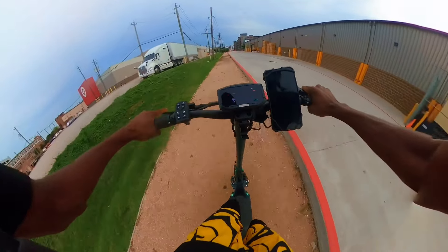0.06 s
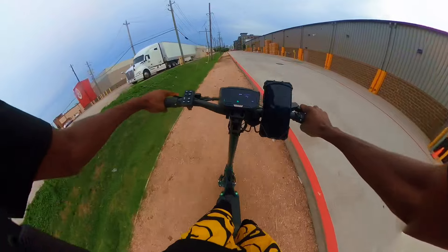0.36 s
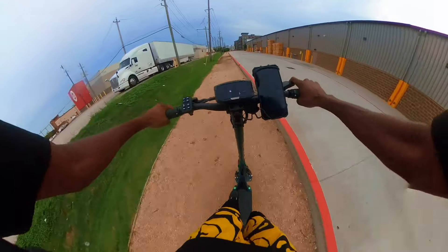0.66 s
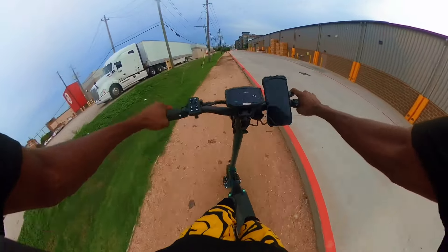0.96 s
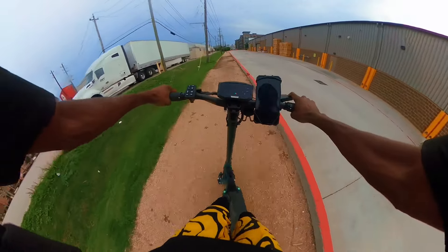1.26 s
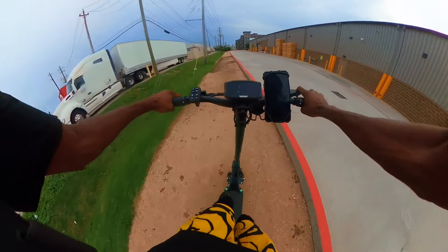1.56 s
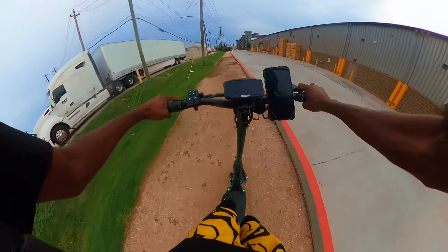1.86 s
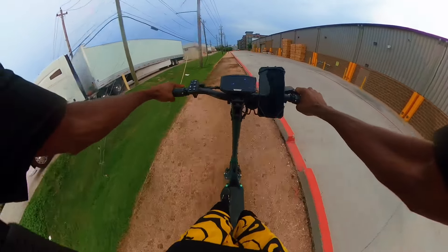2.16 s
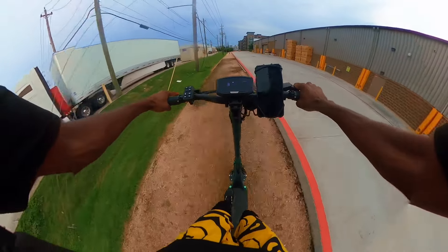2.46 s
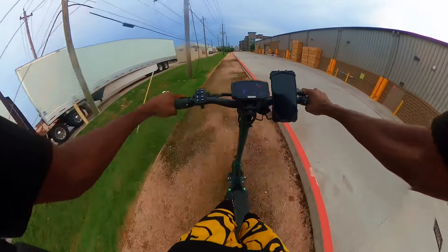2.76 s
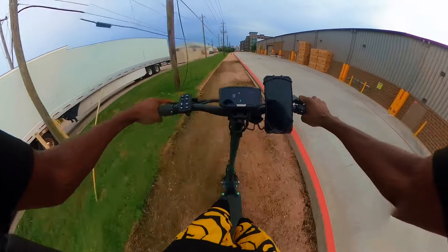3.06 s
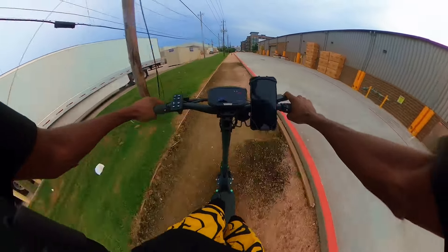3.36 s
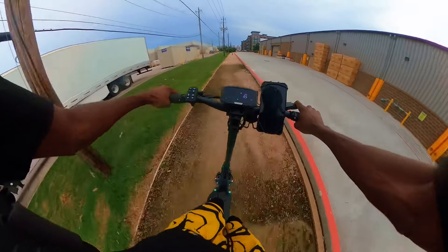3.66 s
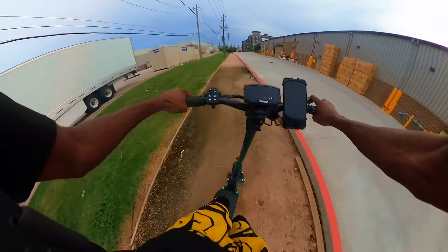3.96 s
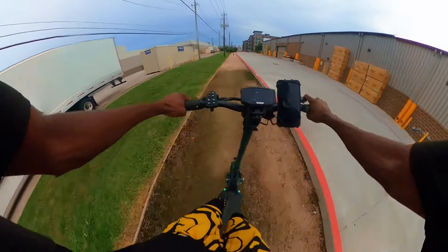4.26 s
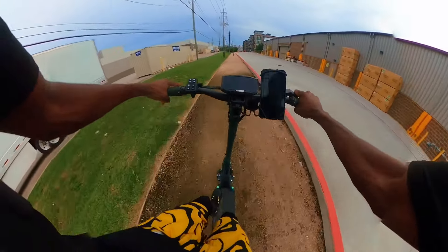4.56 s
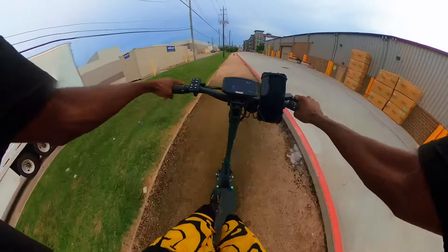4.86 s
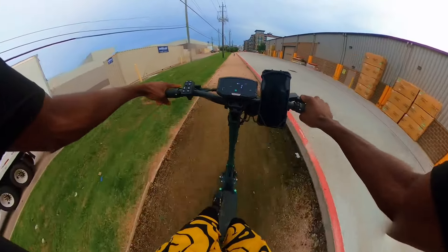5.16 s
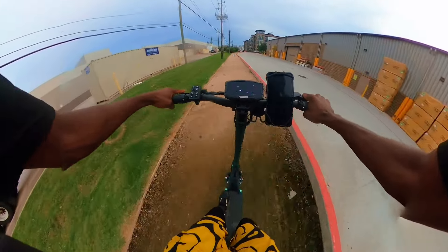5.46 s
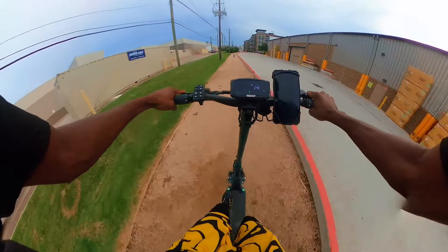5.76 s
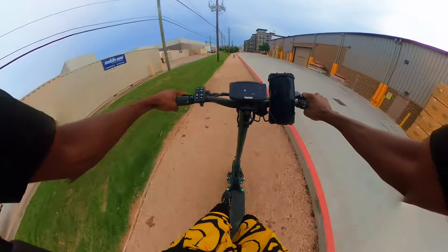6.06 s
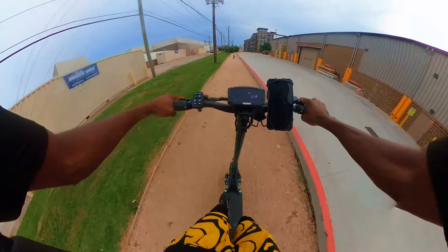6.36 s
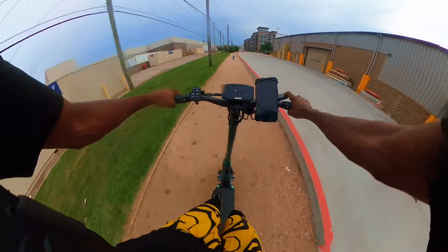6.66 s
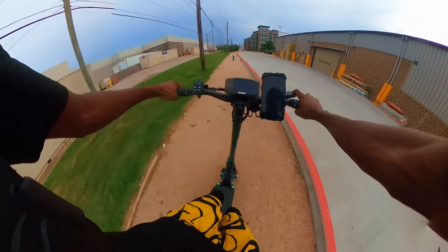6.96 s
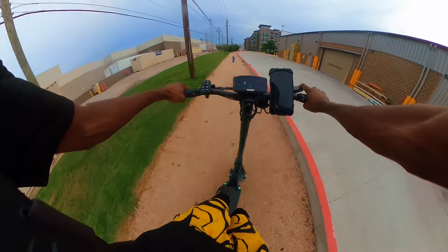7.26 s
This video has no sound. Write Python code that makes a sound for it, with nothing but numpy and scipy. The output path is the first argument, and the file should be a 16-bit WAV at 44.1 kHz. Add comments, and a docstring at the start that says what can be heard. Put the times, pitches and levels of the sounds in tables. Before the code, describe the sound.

An electric scooter rolls along an outdoor dirt path, its tyres rumbling and crunching through patches of gravel. Grit sprays, pebbles tick on the frame and a loose fitting rattles now and then. A faint, high motor whine fades early while the frame shudders, then bumps give the deck low, hollow thumps. The ride smooths briefly and turns rough again near the end. Wind buffets the close microphone on the rider throughout.

```python
"""Gravel crunches and rumbles under the tyres of an electric scooter on a dirt path.
Stones drum on the tread and ring the casings, grit sprays, pebbles tick on the frame.
The deck thumps over bumps and shudders, a loose fitting rattles, gravel excites a thin, high ring.
The motor drive whines faintly, and wind buffets a microphone on the rider."""
import sys
import numpy as np
from scipy import signal
from scipy.fft import rfft, irfft, next_fast_len
from scipy.io import wavfile
from scipy.ndimage import map_coordinates

SR = 44100
rng = np.random.default_rng(int(sys.argv[2]) if len(sys.argv) > 2 else 0)


def int16_out(signal):
    """Quantize to a 16-bit WAV file."""
    q = np.round(np.clip(np.atleast_2d(signal).T, -1, 1) * 32767)
    wavfile.write(sys.argv[1], SR, q.astype(np.int16))


N = 331632
T = np.arange(N) / SR


# packed dirt coarseness: t/s, relative level/dB
DIRT = [(0, -25), (.65, -30), (1.3, -27.5), (1.95, -33.5), (2.65, -30.5), (3.35, -42.5), (4.4, -30.5),
        (4.56, -43.5), (4.68, -46.5), (4.8, -29.5), (5.1, -36.5), (5.8, -43), (6.15, -42), (6.33, -34),
        (6.75, -32), (7.5, -25)]
# rough patches: t/s, length/s, relative rumble/dB, relative roar/dB
ROUGH_PATCHES = [(0, 0.083, -22, -47), (0.287, 0.22, -22, -42), (0.772, 0.16, -25, -22.5),
                 (1.382, 0.25, -24.5, -25), (1.758, .11, -31.5, -29), (2.087, 0.352, -25, -33),
                 (2.936, 0.059, -26.5, -48), (3.473, 0.12, -23, -25), (3.548, .2, -30, -23),
                 (3.833, 0.672, -30, -22.5), (3.897, 0.38, -28.5, -21), (4.728, 0.07, -28.5, -26),
                 (4.843, 0.13, -25, -27.5), (6.832, 0.12, -26.5, -23.5), (7.019, 0.12, -20.5, -17),
                 (7.12, 0.11, -23.5, -22.5), (7.318, 0.11, -23.5, -21.5)]
# loose gravel: t/s, length/s, release/s, relative crunch/dB, relative spray/dB
GRAVEL_BEDS = [(0, 0.41, .45, -40, -51), (0.806, .73, .63, -51.5, -67), (2.026, 0.54, 0.66, -43.5, -58.5),
               (3.567, 0.12, 0.12, -52, -56), (3.827, 0.64, 0.027, -51.5, -73),
               (4.69, 0.31, 0.19, -46.5, -58.5), (4.85, 0.29, 0.39, -46.5, -57),
               (6.284, 0.63, 0.33, -48, -69)]
def tyres():
    """Dirt, rough patches and gravel drive four layers; uneven load modulates all but the spray."""
    dirt_db, = curves(DIRT)
    rumble_gain, roar_gain = amp(dirt_db + 2), amp(dirt_db - 0.9)
    for start, length, rumble_db, roar_db in ROUGH_PATCHES:
        patch = crossing(start, length, attack_s=0.031, release_s=0.033)
        rumble_gain = power_sum(rumble_gain, patch * amp(rumble_db))
        roar_gain = power_sum(roar_gain, patch * amp(roar_db))
    crunch_gain = power_sum(amp(0.35 * dirt_db - 36.5), amp(-29) * roar_gain)
    spray_gain = amp(0.3 * dirt_db - 54)
    for start, length, release, crunch_db, spray_db in GRAVEL_BEDS:
        bed = crossing(start, length, attack_s=0.032, release_s=release)
        crunch_gain = power_sum(crunch_gain, bed * amp(crunch_db))
        spray_gain = power_sum(spray_gain, bed * amp(spray_db))
    load = wobble(45)
    rolling = rumble_gain * tread_rumble(load) + roar_gain * casing_roar(load)
    return rolling + crunch_gain * gravel_crunch(load) + spray_gain * grit_spray()


# tread spectrum: f/Hz, relative level/dB
TREAD_SPECTRUM = [(80, -32), (180, -4), (260, -2.5), (390, 2.5), (540, -1.5), (620, -4.5), (900, -9.5),
                  (1300, -15.5), (1700, -16.5), (2500, -53), (5000, -79)]
def tread_rumble(load):
    """Stones drum on the tread."""
    return amp(-3 + 1.4 * load) * coloured(contacts(per_s=2600, spread_db=2.5), TREAD_SPECTRUM)


# casing resonances: f/Hz, width/Hz, relative level/dB
CASING_MODES = [(535.5, 35, 2), (677, 76, 4.5), (820, 109, 4), (1310, 230, -17), (1760, 240, -22),
                (2130, 100, -21.5), (3150, 480, -25.5)]
def casing_roar(load):
    """Stones ring the flexing casing; its pitch wanders."""
    ring = resonate(contacts(per_s=1800, spread_db=1), CASING_MODES)
    ring = unit(band(ring, 480, 2980))
    return amp(-3 + 1.3 * load) * drift(ring, share=0.03, per_s=12)


# crunch spectrum: f/Hz, relative level/dB
CRUNCH_SPECTRUM = [(500, -23.5), (1000, 8.5), (1500, -2.5), (1900, 4), (2300, 0.5), (2650, 2), (3200, -4),
                   (4000, -10), (5100, -16.5), (6500, -22.5), (9000, -33.5)]
def gravel_crunch(load):
    """Stones grind together under the tyres."""
    return amp(3.5 + 1.33 * load) * coloured(contacts(per_s=5000, spread_db=0.5), CRUNCH_SPECTRUM)


# grit spectrum: f/Hz, relative level/dB
GRIT_SPECTRUM = [(2500, -23), (4400, -0.5), (5200, 2), (5900, -2.5), (6800, -1.5), (8600, -11.5),
                 (9100, -16.5), (11500, -17), (13700, -25), (15700, -36.5)]
def grit_spray(chips_per_s=280, centre_hz=6000, span_octaves=1.8, t60_s=0.022):
    """Fine grit hisses off the wheels in spurts; coarser chips crackle, each at its own pitch."""
    hiss = amp(wobble(22)) * coloured(contacts(per_s=6000, spread_db=1.5), GRIT_SPECTRUM)
    chips, t = np.zeros(N), T[:SR // 30]
    for when, pitch, softness in rng.random((int(chips_per_s * N / SR), 3)):
        hz = centre_hz * 2 ** (span_octaves * (pitch - 0.5))
        blur_rad = 0.28 * np.cumsum(rng.standard_normal(len(t)))
        envelope = amp(-3 * np.log(softness + 0.03) - 60 * t / t60_s)
        add(chips, when * N / SR, envelope * np.sin(2 * np.pi * hz * t + blur_rad))
    return amp(-1.2) * (hiss + 0.95 * coloured(chips, GRIT_SPECTRUM))


# stones on a tyre: t/s, level/dB, f/Hz
STONE_STRIKES = [(.81, -12, 845), (1.148, -16.5, 820), (1.407, -15.5, 770), (1.535, -8, 410),
                 (2.133, -13, 530), (2.372, -19, 646), (3.136, -22, 780), (3.578, -17, 786),
                 (3.675, -11, 726), (4.023, -12, 810), (4.07, -13.5, 736), (7.078, -6.5, 374),
                 (7.17, -10, 790), (7.298, -17.5, 820), (7.433, -10, 760)]
def stone_strikes():
    """A larger stone gives the tyre one hollow knock, pitched by where it hits."""
    out, t = np.zeros(N), T[:SR // 10]
    for start, db, hz in STONE_STRIKES:
        scuff = unit(noise(0.57 * hz, 1.53 * hz, t))
        knock = np.sin(2 * np.pi * hz * t) + 0.24 * scuff
        add(out, start, amp(db) * knock * impact(t, attack_s=0.0007, t60_s=0.031))
    return out


# path bumps: t/s, thump/dB, knock/dB
BUMPS = [(0.287, -9.5, -27), (0.944, -17, -27), (2.984, -10, -20), (3.168, -11, -28), (3.195, -7.5, -23),
         (3.493, -8.5, -32), (3.525, -10, -13), (4.94, -16, -11), (5.386, -9.5, -36), (5.619, -13.5, -21),
         (5.638, -7.5, -8), (6.897, -14, -16)]
def bumps(thump_hz=68, knock_hz=750, lowpass_hz=3800):
    """A bump shoves the deck in one low, hollow thump and knocks the tyre casing."""
    out, t = np.zeros(N), T[:SR // 4]
    for start, thump_db, knock_db in BUMPS:
        shove = np.sin(2 * np.pi * thump_hz * np.exp(0.082 * rng.normal()) * t)
        thud = unit(noise(122, 244, t))
        thump = (shove + 0.31 * thud) * impact(t, attack_s=0.0015, t60_s=0.16)
        scuff = unit(noise(220, 780, t))
        ring = np.sin(2 * np.pi * knock_hz * np.exp(0.034 * rng.normal()) * t)
        knock = (0.7 * scuff + 0.2 * ring) * impact(t, attack_s=0.0013, t60_s=0.045)
        add(out, start, amp(thump_db) * thump + amp(knock_db) * knock)
    return filtered(out, lambda hz: 1 / (1 + 1j * hz / lowpass_hz) ** 2)


# frame vibration: t/s, level/dB
SHUDDER = [(0, -38), (.7, -31.5), (1.0, -23.5), (1.85, -20), (2.3, -26.5), (2.55, -30), (2.8, -21),
           (3.1, -29), (3.5, -54)]
def frame_shudder(shake_hz=38.8):
    """The wheels shake the frame at a nearly steady rate; the deck booms with it."""
    level_db, = curves(SHUDDER)
    phase = 2 * np.pi * np.cumsum(shake_hz * (1 + 0.0069 * wobble(6))) / SR
    boom = unit(noise(85, 139.5))
    return amp(level_db + 2.1 * wobble(4.4)) * (unit(np.sin(phase)) + amp(-12.5) * boom)


# pebbles on the frame: t/s, relative level/dB, f/Hz
PEBBLE_HITS = [(0.083, -38, 7860), (0.126, -23.5, 4130), (0.332, -33, 6400), (0.429, -32, 5100),
               (1.048, -38.5, 5560), (1.756, -46, 6500), (2.0258, -44, 7500), (2.062, -48, 8000),
               (2.110, -44, 7000), (2.217, -38, 5000), (2.491, -34.5, 4600), (2.634, -41, 5500),
               (3.67, -39, 4560), (4.734, -47, 6800), (5.2026, -42, 4800), (6.0557, -48, 6930),
               (6.161, -40, 5470), (6.548, -49, 6000), (6.62, -33, 4400), (6.7, -33, 4370)]
def pebble_ticks(attack_s=0.0011, overtone_ratio=1.6):
    """Each pebble gives a gritty crack and a two-toned clink; smaller ones sound higher."""
    out, t = np.zeros(N), T[:SR // 10]
    for start, db, hz in PEBBLE_HITS:
        crack = noise(0.5 * hz, 1.57 * hz, t) * impact(t, attack_s, t60_s=0.041)
        ring = sum(unit(noise(0.84 * k * hz, 1.1 * k * hz, t)) / k ** 2 for k in (1, overtone_ratio))
        clink = ring * impact(t, attack_s, t60_s=0.076)
        add(out, start, amp(db) * (crack + 0.4 * clink))
    return band(out, 1500, 8800)


# rattle bursts: t/s, level/dB
RATTLES = [(.04, -37), (.19, -31), (.34, -36), (2.125, -33), (2.71, -33.5), (3.049, -41), (4.88, -34.5),
           (5.045, -35.5)]
# fitting resonances: f/Hz, width/Hz, relative level/dB
FITTING_MODES = [(1850, 130, 2), (2610, 310, 3)]
def fitting_rattle():
    """Short flurries of contacts ring a loose metal fitting."""
    envelope, t = np.zeros(N), T[:SR // 3]
    for start, db in RATTLES:
        add(envelope, start, amp(db) * impact(t, attack_s=0.007, t60_s=0.27))
    ring = resonate(contacts(per_s=2600, spread_db=3), FITTING_MODES)
    return envelope * unit(band(ring, 1400, 4800, order=4))


# tyre air resonance: f/Hz, width/Hz, relative level/dB
CAVITY_MODES = [(805, 134, 3)]
def tyre_hum():
    """The rolling tyres drone even on smooth dirt, and the air inside them hums."""
    drone = unit(noise(130, 211))
    cavity = unit(resonate(rng.standard_normal(N), CAVITY_MODES))
    return amp(-41.5) * drone + amp(-42.5 + 1.5 * wobble(11)) * band(cavity, 300, 1500)


# whine under throttle: t/s, lower tone/dB, upper tone/dB
THROTTLE = [(0, -61, -84), (.33, -69, -90.5), (.7, -68, -90), (1.15, -77, -86.5), (1.92, -81, -84.5),
            (2.05, -120, -120)]
def motor_whine():
    """Drive switching gives two faint fixed tones over a thin fizz; the lower one flickers."""
    lower_db, upper_db = curves(THROTTLE)
    fizz = unit(amp(3 * wobble(70)) * noise(9500, 14000))
    lower = amp(2 * wobble(35)) * tone(hz=8715, blur_hz=230)
    upper = tone(hz=13715, blur_hz=130)
    return amp(lower_db) * lower + amp(upper_db) * (upper + amp(10) * fizz)


# ring swells: t/s, length/s, level/dB
THIN_RINGS = [(0.45, 0.13, -54), (2.2, .12, -63), (6.38, .38, -70)]
def thin_ring():
    """A thin, high ring swells briefly as gravel passes under the wheels."""
    envelope = np.zeros(N)
    for start, length, db in THIN_RINGS:
        from_centre = 2 * (T - start) / length - 1
        envelope += amp(db) * np.sqrt(np.clip(1 - from_centre ** 2, 0, 1))
    return envelope * tone(hz=6797, blur_hz=90)


# steady wind: t/s, relative level/dB
BREEZE = [(0, -23.5), (.7, -27.5), (1.3, -31.5), (3.3, -26), (4.1, -32.5), (4.7, -30.5), (5.2, -27),
          (6.9, -29), (7.3, -35)]
# gust peaks: t/s, relative level/dB
GUSTS = [(2.7, -23), (2.87, -24), (3.63, -21.5), (3.79, -21.5), (4.98, -22), (5.45, -22.5), (5.58, -18.5),
         (5.88, -32.5), (6.51, -30), (6.9, -21.5)]
# buffeting spectrum: f/Hz, relative level/dB
WIND_SPECTRUM = [(8, -14.5), (25, 5), (50, 1), (85, -1.5), (120, -3.5), (170, -13.5), (260, -18),
                 (500, -33), (1200, -59)]
def wind(gust_sigma_s=0.038):
    """A breeze with short gusts; eddies push on the microphone in quick lumps."""
    breeze_db, = curves(BREEZE)
    gusts = [amp(db) * np.exp(-0.5 * ((T - peak) / gust_sigma_s) ** 2) for peak, db in GUSTS]
    eddies = unit(amp(1.6 * wobble(14)) * coloured(rng.standard_normal(N), WIND_SPECTRUM))
    return amp(4.5) * power_sum(amp(breeze_db), *gusts) * eddies


def amp(db):
    """Decibels to gain."""
    return 10 ** (np.asarray(db) / 20)


def unit(x):
    """Scale to rms 1."""
    return x / np.sqrt(np.mean(x ** 2) + 1e-20)


def power_sum(*gains):
    """Joint gain of uncorrelated sounds."""
    return np.sqrt(sum(g ** 2 for g in gains))


def curves(rows):
    """Per-sample curve for each column after the time."""
    times, *columns = np.transpose(rows)
    return [np.interp(T, times, column) for column in columns]


def crossing(start_s, length_s, attack_s, release_s):
    """Trapezoid envelope of the wheels crossing a stretch of ground."""
    rise = np.clip((T - start_s) / attack_s, 0, 1)
    return rise * np.clip(1 - (T - start_s - length_s) / release_s, 0, 1)


def impact(t, attack_s, t60_s):
    """Fast rise, exponential decay."""
    return (1 - np.exp(-t / attack_s)) * amp(-60 * t / t60_s)


def wobble(per_s):
    """Smooth random curve, per_s knots a second."""
    return map_coordinates(rng.standard_normal(int(N * per_s / SR) + 4), [T * per_s])


def contacts(per_s, spread_db):
    """Random impulses, a few harder than the rest."""
    hit = rng.random(N) < per_s / SR
    size = amp(spread_db * np.minimum(rng.exponential(size=N), 4))
    return unit(hit * size * rng.choice([-1, 1], N))


def noise(low_hz, high_hz, t=T):
    """Band noise as long as t."""
    return band(rng.standard_normal(len(t)), low_hz, high_hz)


def tone(hz, blur_hz):
    """Steady-level sine, blurred in pitch."""
    return unit(np.sin(2 * np.pi * hz * T + 2 * wobble(blur_hz)))


def drift(x, share, per_s):
    """Let the pitch wander by a small share."""
    return map_coordinates(x, [np.arange(N) + np.cumsum(share * wobble(per_s))], mode="mirror")


def band(x, low_hz, high_hz, order=2):
    """Causal band-pass."""
    sos = signal.butter(order, [low_hz, min(high_hz, 0.49 * SR)], "band", fs=SR, output="sos")
    return signal.sosfilt(sos, x)


def filtered(x, response):
    """Apply a frequency response."""
    size = next_fast_len(len(x) + 8192)
    return irfft(rfft(x, size) * response(np.fft.rfftfreq(size, 1 / SR)), size)[:len(x)]


def coloured(x, spectrum):
    """Shape by (f/Hz, level/dB) points on a log axis, to rms 1."""
    f, db = np.transpose(spectrum)
    return unit(filtered(x, lambda hz: amp(np.interp(np.log(hz + 1), np.log(f), db, right=-120))))


def resonate(x, modes):
    """Parallel resonances of alternating sign."""
    def response(f):
        return sum((-1) ** k * amp(db) * 1j * f * width / (hz * hz - f * f + 1j * f * width)
                   for k, (hz, width, db) in enumerate(modes))
    return filtered(x, response)


def add(track, start_s, sound):
    """Mix a sound in at start_s."""
    span = track[max(round(start_s * SR), 0):][:len(sound)]
    span += sound[:len(span)]


def scene():
    """All sources at one close microphone in open air."""
    ground = tyres() + stone_strikes() + bumps() + pebble_ticks() + tyre_hum()
    scooter = frame_shudder() + fitting_rattle() + motor_whine() + thin_ring()
    return (ground + scooter + wind())[None]


def record(dry):
    """Brick-wall low-pass."""
    top_hz = 15700
    return np.array([filtered(channel, lambda hz: hz < top_hz) for channel in dry])


dry = scene()
out = record(dry)
int16_out(out)
```